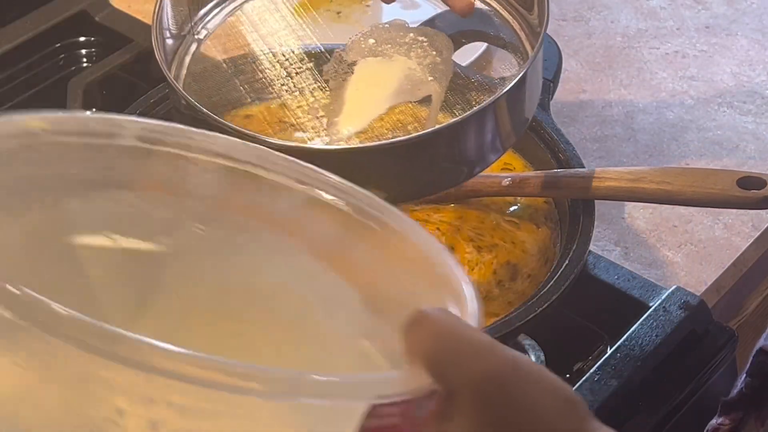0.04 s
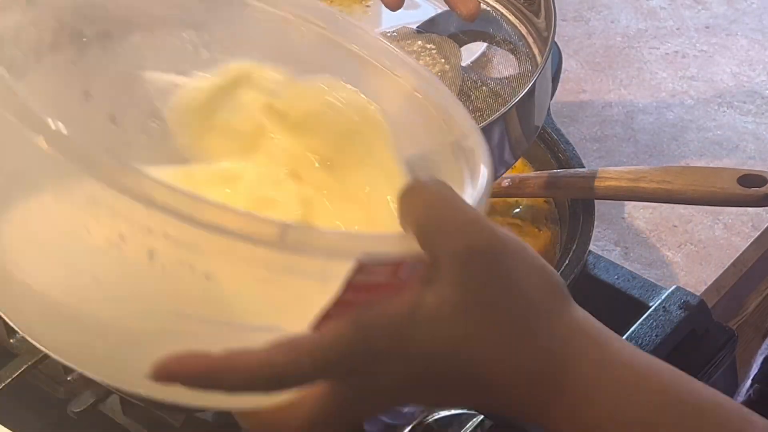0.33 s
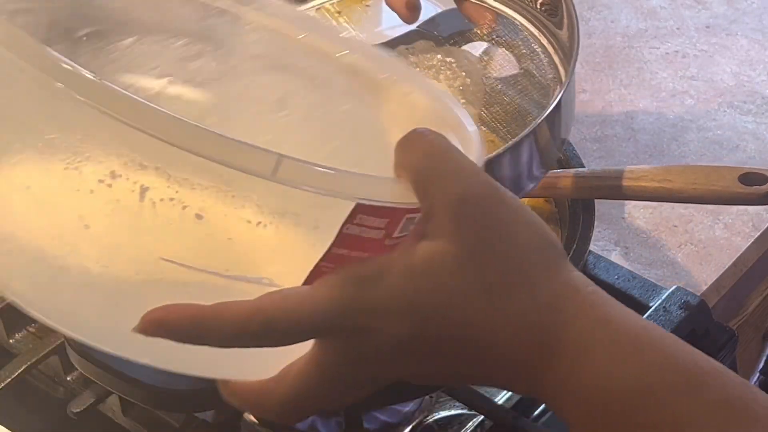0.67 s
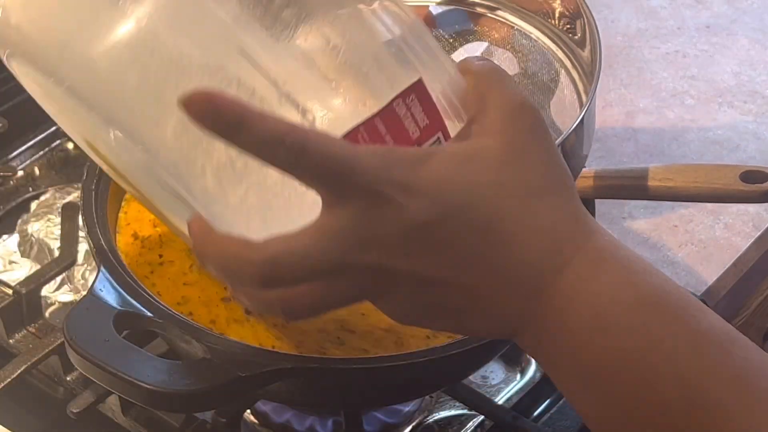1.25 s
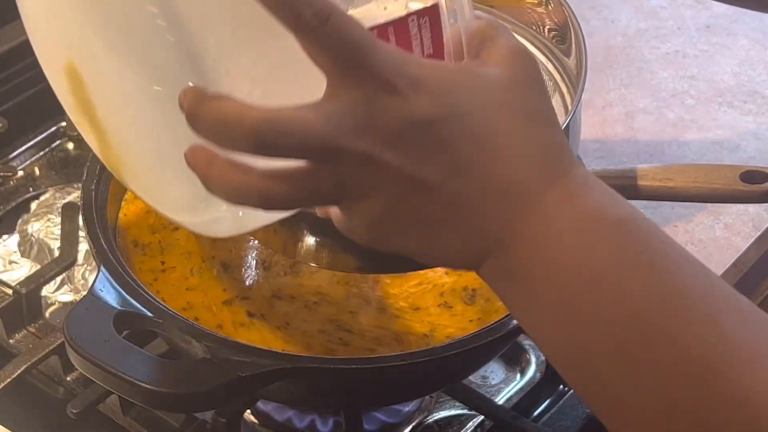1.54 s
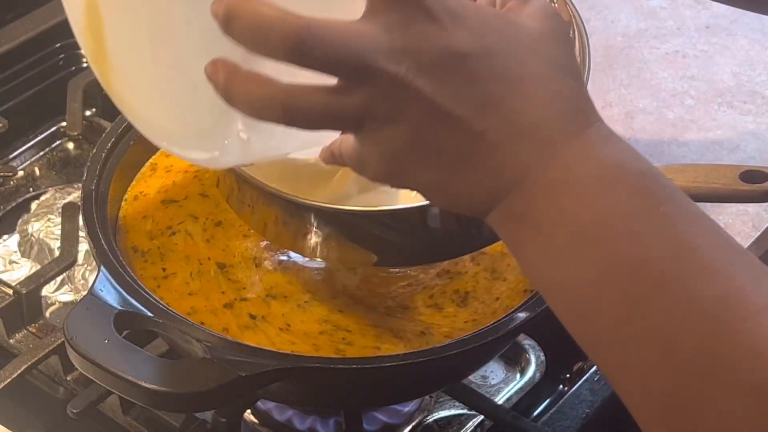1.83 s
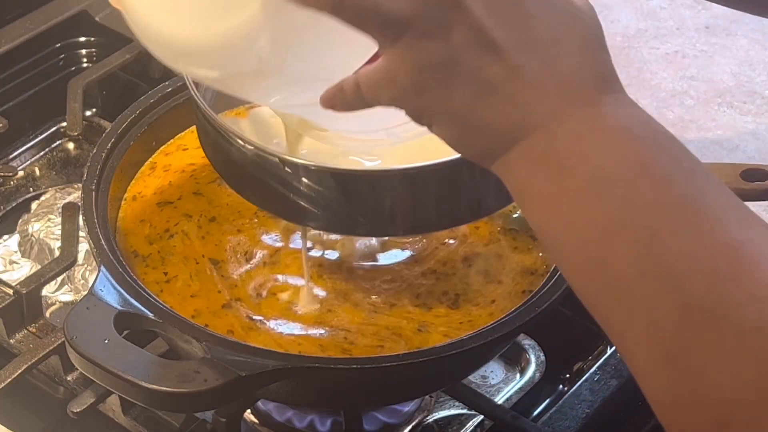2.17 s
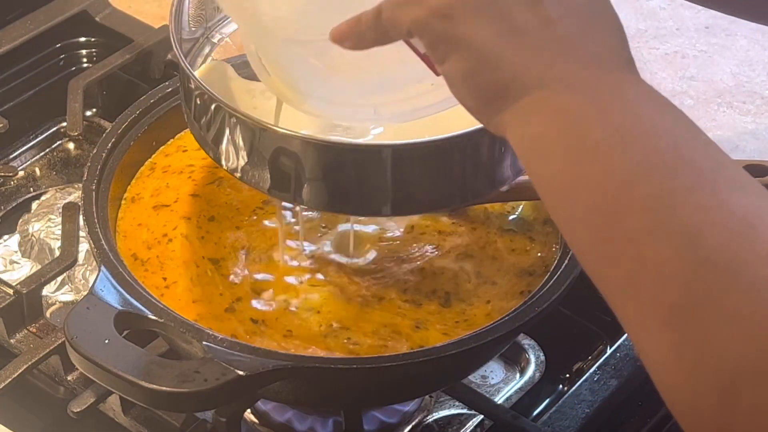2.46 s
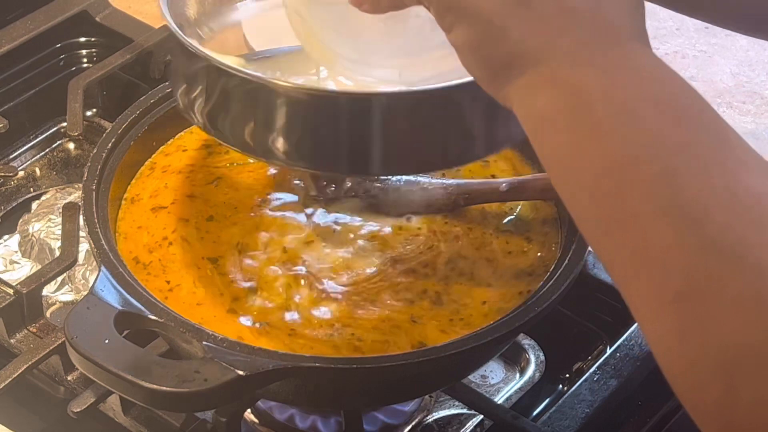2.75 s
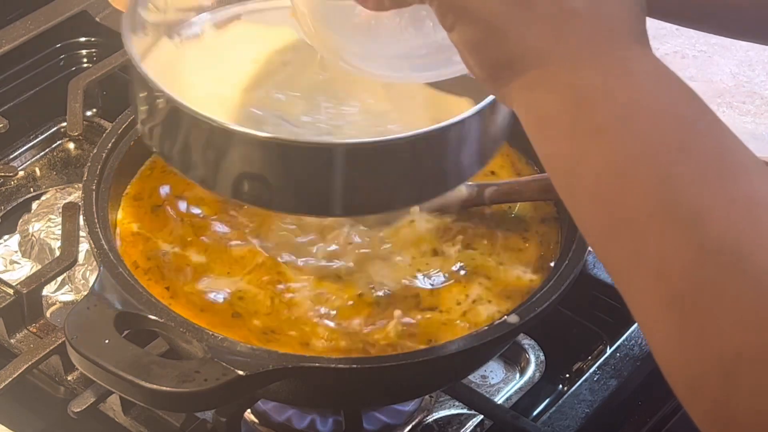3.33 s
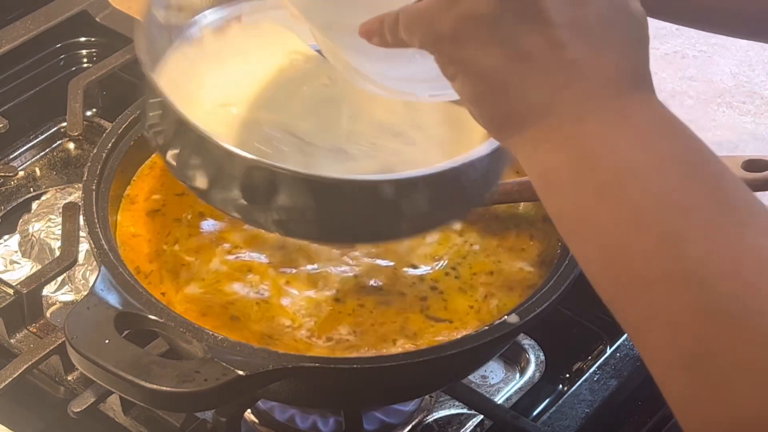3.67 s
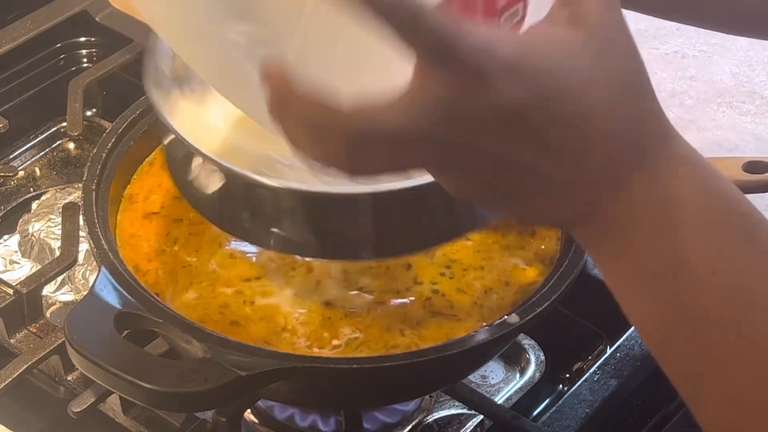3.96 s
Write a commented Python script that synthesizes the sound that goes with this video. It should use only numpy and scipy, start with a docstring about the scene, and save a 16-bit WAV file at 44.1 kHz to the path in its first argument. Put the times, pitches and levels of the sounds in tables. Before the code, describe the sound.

Liquid drips and trickles through a sieve into soup, heard close in a small kitchen. A few drops land around 0.3 seconds. A plastic bowl clacks on the ringing steel sieve at 0.9 and knocks at 1.2. From 1.5 seconds a fine trickle patters to the end, with a small gurgle and splash near 2 and another knock at 2.7. A low hum and soft burner rush continue underneath.

```python
"""A small kitchen, close to a pot of soup. Creamy liquid is tipped in from a plastic bowl through a
steel sieve. It lands in soft splats, traps bubbles that ring briefly and trickles from the mesh;
one air pocket gurgles shut. The bowl knocks and scrapes on the sieve, and the wires buzz.
The room answers briefly, over a low mains hum and the soft rush of the burner."""
import sys
import numpy as np
from scipy import signal
from scipy.fft import rfft, irfft
from scipy.io import wavfile
from scipy.ndimage import uniform_filter1d

SR = 44100
rng = np.random.default_rng(int(sys.argv[2]) if len(sys.argv) > 2 else 0)


def materialize(psi):
    """Save the field psi as 16-bit PCM at rate SR to the path in sys.argv[1].

    A 1-D psi becomes a single channel; in a 2-D psi each row is a channel.
    """
    bounded = np.clip(np.atleast_2d(psi).T, -1, 1)
    quanta = np.round(bounded * 32767).astype(np.int16)
    wavfile.write(sys.argv[1], SR, quanta)


N = 176400
TOP_HZ = 15900


def bubble(hz, decay_s, wobble=0):
    """A trapped bubble rings and rises in pitch as it nears the surface."""
    t = seconds(7 * decay_s)
    rise = 1 + .01 * t / decay_s
    turns = hz * (slosh(t, wobble) if wobble else t) * rise
    onset = 1 - np.exp(-2 * hz * t)
    x = np.sin(2 * np.pi * turns) * np.exp(-t / decay_s) * onset
    return x / (np.abs(x).max() + 1e-9)


def slosh(t, share, rate_hz=260):
    """Sloshing liquid unsettles a pitch: a time axis that runs fast and slow at random."""
    drift = np.interp(t * rate_hz, np.arange(128), rng.standard_normal(128))
    return t + share * np.cumsum(drift) / SR


# Single drops. Each row: start in seconds, bubble pitch in Hz, peak in dB, decay in ms.
DROPS = [(.212, 2520, -58.5, 3.5), (0.2619, 5700, -42.5, 0.84), (0.2753, 8800, -40.5, 0.5),
         (0.2922, 5420, -42.5, 1.2), (0.2988, 4120, -47, 1.9), (.29, 2760, -52, 2.2),
         (.322, 2480, -50.5, 2), (0.332, 2600, -52, 3), (0.3376, 2360, -42, 0.84),
         (0.3514, 626, -38.5, 4.8), (.429, 4710, -55.5, 9.5), (1.5335, 5450, -49, 4),
         (1.6133, 6200, -43.5, 2), (1.6475, 1002, -43.5, 8.3), (1.648, 1870, -45.5, .8),
         (1.789, 4720, -47.5, 2.5), (1.841, 2080, -54.5, 2.7), (1.9506, 2210, -39.5, 4.8),
         (1.9592, 839, -40, 13.6), (1.996, 6500, -38, 1.1), (2.002, 3020, -49, 3),
         (2.0722, 5770, -25.5, 1.44), (2.0724, 7600, -25, 0.41), (2.076, 3170, -51, 14),
         (2.125, 1190, -51, 19.4), (2.163, 1684, -54.5, 4.4), (2.165, 4870, -44.5, 2),
         (2.212, 3000, -50, 4.3), (2.2267, 4190, -45, 2.5), (2.2718, 4700, -52.5, 2),
         (2.3046, 2890, -51.5, 5), (2.353, 5250, -63, 3.1), (2.396, 2500, -56, 3), (2.417, 1510, -53, 6.3),
         (2.44, 1470, -58, 5), (2.486, 1350, -49, 2.2), (2.578, 5420, -50, 3.8), (2.59, 4420, -42, 1.8),
         (2.6312, 2780, -46, 1.5), (2.676, 8780, -46, 2.5), (2.907, 7800, -44.5, 1.2),
         (3.0563, 8430, -46, 2.4), (3.069, 6350, -48, 3.7), (3.091, 2510, -57, 6.3),
         (3.1768, 1670, -46.5, 3.8), (3.175, 2920, -40, 0.3), (3.191, 3000, -43.5, 2),
         (3.2501, 2070, -50.5, 16), (3.253, 3020, -47, 6.7), (3.273, 1637, -40.5, 6.9),
         (3.278, 1140, -47, 5), (3.284, 850, -46.5, 24), (3.3345, 1680, -45, 3.2), (3.335, 3870, -48, 0.56),
         (3.4411, 1920, -52, 2.6), (3.462, 5300, -53, 2.16), (3.565, 2113, -56.5, 10),
         (3.6166, 2430, -46, 1.7), (3.626, 1138, -49.5, 21.6), (3.816, 3720, -39, 3.2),
         (3.8158, 4730, -35, 0.59)]


def drops():
    """Each drop ticks on impact and traps a ringing bubble."""
    out, t = np.zeros(N), seconds(.0062)
    for start, hz, db, decay_ms in DROPS:
        tick = band(rng.standard_normal(len(t)) * np.exp(-t / .0013), hz=5500, width=.7)
        add(out, start, undb(db) * bubble(hz, decay_ms / 1000, wobble=.05))
        add(out, start, undb(db - 10) * tick / np.abs(tick).max())
    return out


def spray(length_s, per_s, hz, spread_octaves, decay_cycles, scatter_db):
    """Tiny bubbles at random moments, levels and pitches; unit RMS over the length."""
    out = np.zeros(int((length_s + .05) * SR))
    starts = np.append(0, rng.uniform(0, length_s, int(length_s * per_s)))
    for start in starts:
        pitch_hz = min(hz * 2 ** rng.normal(0, spread_octaves), TOP_HZ)
        add(out, start, undb(rng.normal(0, scatter_db)) * bubble(pitch_hz, decay_cycles / pitch_hz))
    return out / np.sqrt(np.sum(out ** 2) / (length_s * SR))


# Soft splats. Each row: start in seconds, length in seconds, level in dB, centre pitch in Hz.
SPLATS = [(0.255, 0.069, -71.5, 5800), (1.609, .04, -58, 5930), (1.631, 0.017, -61, 3500),
          (1.763, 0.055, -62.5, 7200), (1.836, 0.023, -67, 6400), (1.949, 0.075, -63.5, 6480),
          (2.069, .016, -47, 6850), (2.095, 0.047, -55.5, 6730), (2.213, 0.029, -58.5, 6720),
          (2.55, 0.048, -67, 8100), (2.628, .018, -61.5, 6700), (2.712, 0.007, -57.5, 5200),
          (2.872, 0.049, -66, 7340), (3.043, 0.052, -63, 8380), (3.187, 0.0095, -56.5, 5970),
          (3.242, 0.016, -51, 6500), (3.27, 0.0031, -53, 4200), (3.277, 0.021, -62, 6230),
          (3.3336, 0.0036, -55.5, 4000), (3.427, 0.036, -62.5, 7450), (3.563, 0.0067, -63, 5840),
          (3.626, 0.025, -70, 7000), (3.814, .008, -53.5, 7880), (0.272, .06, -64.5, 12500),
          (1.769, 0.068, -75, 13500), (2.629, .012, -71, 13200), (2.878, 0.028, -66.5, 13500),
          (3.037, 0.0093, -67, 13600), (3.233, 0.038, -61.5, 13000), (3.422, 0.066, -66, 13000)]


def splats():
    """Landing liquid scatters short sprays of droplets."""
    out = np.zeros(N)
    for start, length_s, db, hz in SPLATS:
        droplets = spray(length_s, per_s=820, hz=hz, spread_octaves=.3, decay_cycles=6.3, scatter_db=6)
        add(out, start, undb(db) * droplets)
    return out


# Flow from the mesh. Each row: time in seconds, level in dB.
TRICKLE = [(0, -85.5), (1.4, -83.5), (1.65, -70), (2.2, -69.5), (2.448, -77.5), (2.7, -69.5), (3.0, -79),
           (3.3, -69), (3.6, -77.5), (4.0, -79)]


def trickle():
    """A fine stream from the mesh makes a dense patter of bubbles that swells and ebbs."""
    times, db = np.array(TRICKLE).T
    patter = spray(N / SR, per_s=1200, hz=4200, spread_octaves=.75, decay_cycles=5, scatter_db=2)
    return patter[:N] * undb(np.interp(np.arange(N) / SR, times, db))


# Closing air pocket. Each row: time in seconds, resonance in Hz, level in dB.
AIR_POCKET = [(1.966, 830, -48), (1.996, 790, -66), (2.02, 765, -65), (2.048, 810, -50),
              (2.071, 931, -61.5), (2.084, 1186, -56), (2.104, 1394, -63.5), (2.116, 2000, -59.5),
              (2.127, 2200, -61)]


def gurgle(flutter_hz=161.3, roughness=.45):
    """The rising note of a shrinking air pocket, shaken by the falling stream."""
    t = np.arange(N) / SR
    times, hz, db = np.array(AIR_POCKET).T
    jolts = rng.standard_normal(4096) + 1j * rng.standard_normal(4096)
    shake = np.interp(t * flutter_hz, np.arange(4096), jolts)
    turns = np.cumsum(np.interp(t, times, hz)) / SR
    note = np.exp(2j * np.pi * turns) * (1 + roughness * shake)
    gate = uniform_filter1d(((t > times[0]) & (t < times[-1])) * 1., size=200)
    return unit(note.real) * undb(np.interp(t, times, db)) * gate


# Bowl against sieve. Each row: start in seconds, bowl, rim and crack levels in dB,
# crack centre in Hz, pitch factor of the bowl's ring on this knock.
KNOCKS = [(0.8581, -58, -43, -30, 1820, 1.17), (0.8912, -36.5, -19, -22.5, 2400, .93),
          (1.148, -61.5, -81, -53.5, 3030, 1.18), (1.2485, -32.5, -53, -35.5, 1570, 1),
          (2.7483, -30.5, -43, -31.5, 935, 0.97)]
# Modes of the plastic bowl and the steel rim. Each row: frequency in Hz, level in dB, T60 in seconds.
BOWL_MODES = [(177.3, -16, 0.16), (335.5, -15.5, .1), (444, -10, 0.097), (550, -2, 0.084), (650.5, 0, 0.07),
              (754, -6.5, 0.083), (1054, -13, .06), (1972, -11.5, 0.046)]
RIM_MODES = [(2122, -6.5, 0.16), (2280, -5, 0.051), (2510, -4.5, 0.074), (2660, -18.5, .13),
             (2740, -23, .33), (2840, 17.5, 0.017), (2810, -9, 0.15), (2930, 0, .07), (3050, -5.5, 0.2),
             (3160, -7, 0.14), (3170, -10.5, .1), (5100, -18.5, .05)]


def knocks(crack_decay_s=.0029):
    """Each contact cracks and rings both the plastic bowl and the steel rim."""
    out, t = np.zeros(N), seconds(.1)
    for start, bowl_db, rim_db, crack_db, crack_hz, tuning in KNOCKS:
        burst = rng.standard_normal(len(t)) * np.exp(-t / crack_decay_s)
        crack = band(burst, crack_hz, width=1.03, order=2)
        add(out, start, undb(bowl_db) * ring(BOWL_MODES, tuning) + undb(rim_db) * ring(RIM_MODES))
        add(out, start, undb(crack_db) * crack / np.abs(crack).max())
    return out


def ring(modes, tuning=1):
    """The decaying modes of a struck object, excited a little differently on every blow."""
    t, x = seconds(.5), 0
    for hz, db, t60 in modes:
        turns = tuning * hz * slosh(t, share=.014) + rng.random()
        x += undb(db - 60 * t / t60) * np.sin(2 * np.pi * turns)
    onset = 1 - np.exp(-t / .00011)
    return x / np.abs(x).max() * onset


# Sliding rims. Each row: start in seconds, length in seconds, resonance in Hz, level in dB.
SCRAPES = [(0.864, 0.025, 1990, -51), (0.878, 0.023, 6960, -49.5), (2.624, 0.019, 2750, -55.5),
           (2.72, 0.032, 2620, -53), (2.718, 0.0087, 1190, -54)]


def scrapes(slips_per_s=660):
    """The rims stick and slip; the slips excite one narrow resonance."""
    out, t = np.zeros(N), seconds(.1)
    for start, length_s, hz, db in SCRAPES:
        slipping = (rng.random(len(t)) < slips_per_s / SR) & (t < length_s)
        rub = band(slipping * rng.random(len(t)), hz, width=.097)
        add(out, start, undb(db) * unit(rub) * np.sqrt(length_s / t[-1]))
    return out


# Wire buzzes. Each row: start in seconds, level in dB, centre in Hz, decay in seconds.
BUZZES = [(0.8581, -47, 11500, .003), (0.8918, -45, 5550, 0.017), (1.2483, -45, 6760, .016),
          (2.7478, -45, 5600, 0.0086)]


def mesh_buzz():
    """The sieve's wires buzz against their frame after the hard knocks."""
    out, t = np.zeros(N), seconds(.2)
    for start, db, hz, decay_s in BUZZES:
        buzz = unit(band(rng.standard_normal(len(t)), hz, width=.54, order=2))
        add(out, start, undb(db) * buzz * np.exp(-t / decay_s))
    return out


# Reflections off pot wall, hob and counter. Each row: delay in ms, left gain, right gain.
ECHOES = [(1.5, 0.4, 0.033), (5.4, 0.13, 0.51), (9.6, 0.28, 0.52)]
# Reverb bands. Each row: frequency in Hz, level in dB, T60 in seconds, side minus mid in dB.
REVERB = [(250, -6, .35, -6), (682, -2, 0.27, -2), (2310, -7, 0.32, -10.5), (6500, -6, 0.25, -34),
          (14000, -4, 0.18, -32)]


def kitchen(x, onset_s=.0035):
    """Direct sound, a few close reflections and a short diffuse tail, widest in the lows."""
    t = seconds(.5)
    response = np.zeros((2, len(t)))
    for hz, db, t60, side_db in REVERB:
        band_share = at_bins([(row[0], row[0] == hz) for row in REVERB], len(t))
        noise = irfft(rfft(stereo_noise(len(t), side_db)) * np.sqrt(band_share), len(t))
        fade = undb(-60 * t / t60) * (1 - np.exp(-t / onset_s))
        response += undb(db) * noise * fade / np.linalg.norm(fade)
    response[:, 0] += 1
    for ms, left, right in ECHOES:
        response[:, int(ms * SR / 1000)] += left, right
    return signal.fftconvolve(x[None], response, axes=1)[:, :N]


# Mains partials. Each row: frequency in Hz, RMS level in dB.
HUM = [(59.2, -49), (177.6, -71.5)]


def mains_hum(waver_db=.83):
    """The mains tone and its third harmonic waver slightly in level."""
    t = np.arange(N) / SR
    waver = np.interp(t, np.linspace(0, N / SR, 32), rng.standard_normal(32))
    hum = sum(undb(db) * np.sqrt(2) * np.sin(2 * np.pi * (hz * t + rng.random())) for hz, db in HUM)
    return hum * undb(waver_db * waver)


# Room and burner noise. Each row: frequency in Hz, relative spectral density in dB.
RUSH_SPECTRUM = [(20, -23), (45, -3), (80, 0.5), (190, -5.5), (260, -10.5), (460, -11.5), (950, -24.5),
                 (2700, -29.5), (3200, -45), (5000, -40), (8000, -47), (16000, -56.5)]


def air_rush(level_db=-59.5):
    """The soft, low rush of the room and burner."""
    return undb(level_db) * unit(colour(stereo_noise(N, side_db=-11), RUSH_SPECTRUM))


def undb(db):
    return 10 ** (np.asarray(db) / 20)


def unit(x):
    return x / np.sqrt(np.mean(x ** 2) + 1e-20)


def seconds(length_s):
    return np.arange(int(length_s * SR)) / SR


def add(out, start_s, x):
    k = int(np.clip(start_s * SR, 0, len(out)))
    out[k:k + len(x)] += x[:len(out) - k]


def at_bins(points, size):
    """A (Hz, value) table read at the bins of a spectrum."""
    hz, value = np.array(points, float).T
    return np.interp(np.log(np.fft.rfftfreq(size, 1 / SR) + 1), np.log(hz), value)


def colour(x, points):
    """Filter by a (Hz, dB) table."""
    return irfft(rfft(x) * undb(at_bins(points, x.shape[-1])), x.shape[-1])


def band(x, hz, width, order=1):
    """One resonance; the width is roughly a share of the centre."""
    edges_hz = np.minimum(hz * np.exp(np.array([-.5, .5]) * width), [SR / 3, SR / 2 - 1])
    return signal.sosfilt(signal.butter(order, edges_hz, "band", fs=SR, output="sos"), x)


def stereo_noise(size, side_db):
    """Two channels of noise that are partly alike."""
    mid, side = rng.standard_normal((2, size))
    return unit(mid + undb(side_db) * side * np.array([[1], [-1]]))


# Microphone response. Each row: frequency in Hz, gain in dB.
MIC_RESPONSE = [(20, 3.5), (3250, -2), (3900, -3.5), (5200, -4), (8300, -4.5), (10000, -0.5), (12500, -7),
                (15500, -3.5)]


def scene():
    """Pouring and handling in the kitchen, coloured by the microphone, over hum and rush."""
    handling = knocks() + scrapes() + mesh_buzz()
    liquid = drops() + splats() + trickle() + gurgle()
    return colour(kitchen(liquid + handling), MIC_RESPONSE) + mains_hum() + air_rush()


# Microphone port balance. Each row: frequency in Hz, left minus right in dB.
PORT_BALANCE = [(60, .2), (250, .5), (600, 2.2), (1200, 1.5), (2400, -.2), (16000, 0)]


def record(dry, split_hz=8510, lag_s=.00032):
    """Two microphone ports differ in level; above the split the left lags. The top treble is cut."""
    above_hz = np.maximum(np.fft.rfftfreq(N, 1 / SR) - split_hz, 0)
    half = np.array([[.5], [-.5]])
    balance = undb(half * at_bins(PORT_BALANCE, N))
    lag = np.exp(-2j * np.pi * half * above_hz * lag_s)
    lowpass = signal.ellip(10, .2, 80, TOP_HZ, fs=SR, output="sos")
    return signal.sosfilt(lowpass, irfft(rfft(dry) * balance * lag, N))


dry = scene()
out = record(dry)
materialize(out)
```